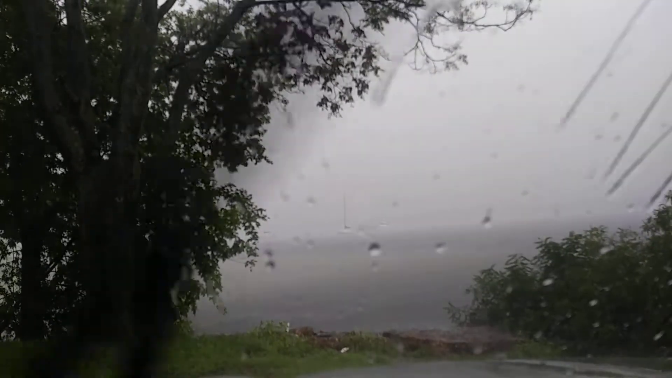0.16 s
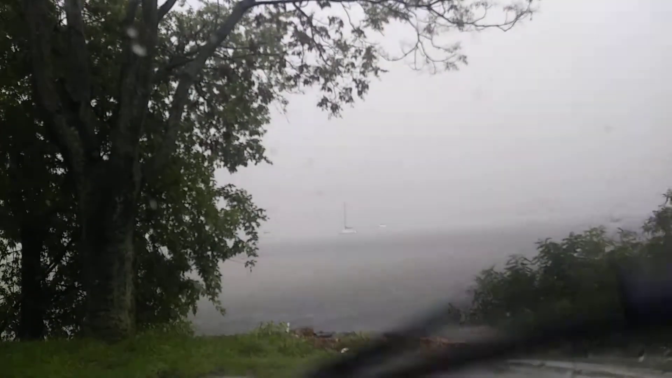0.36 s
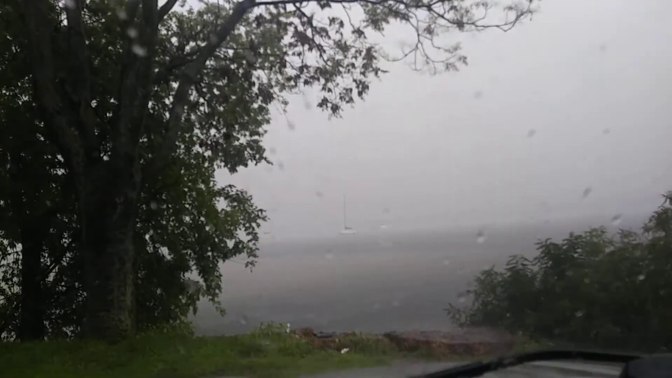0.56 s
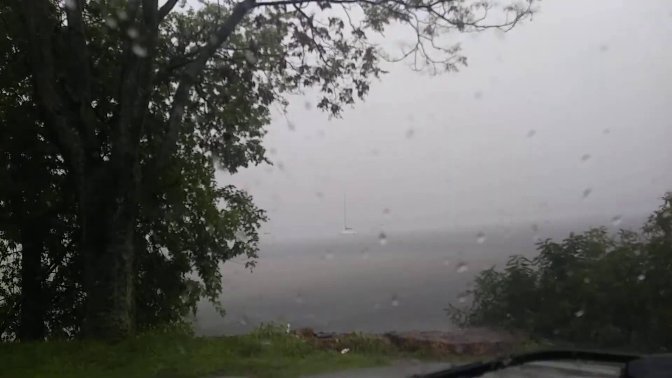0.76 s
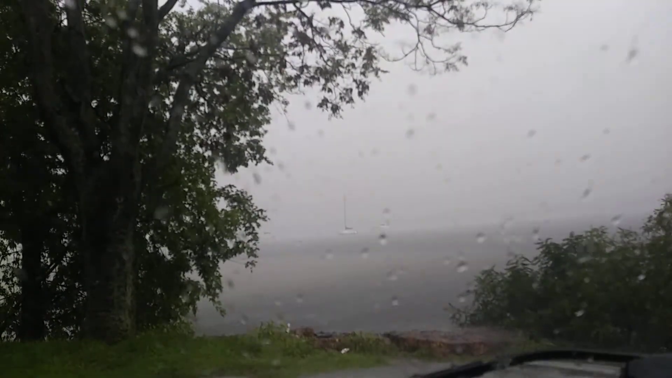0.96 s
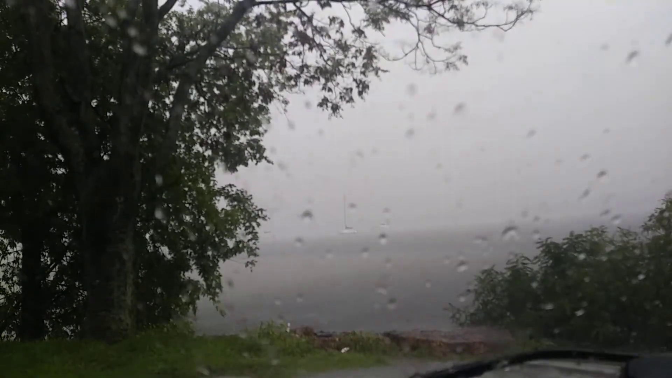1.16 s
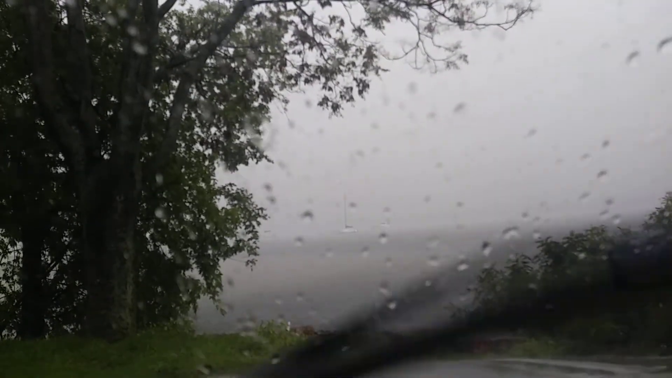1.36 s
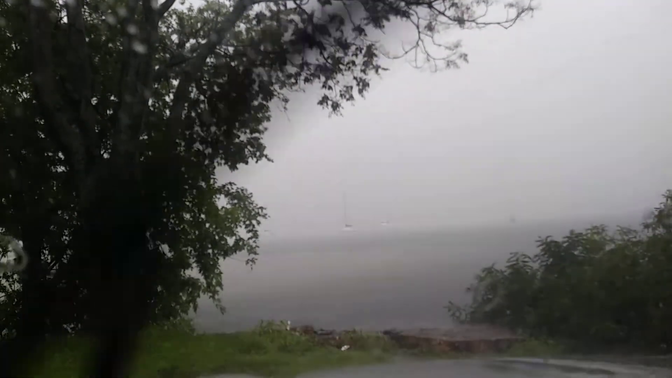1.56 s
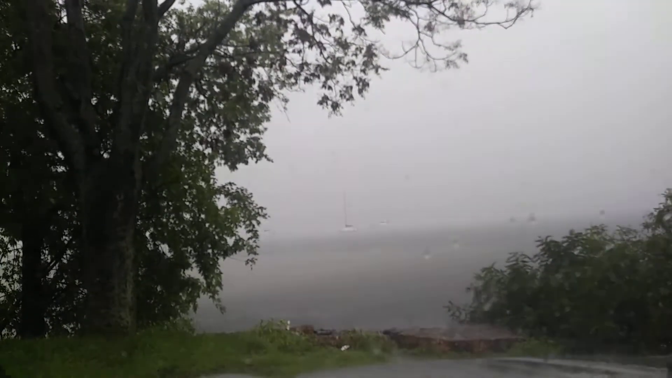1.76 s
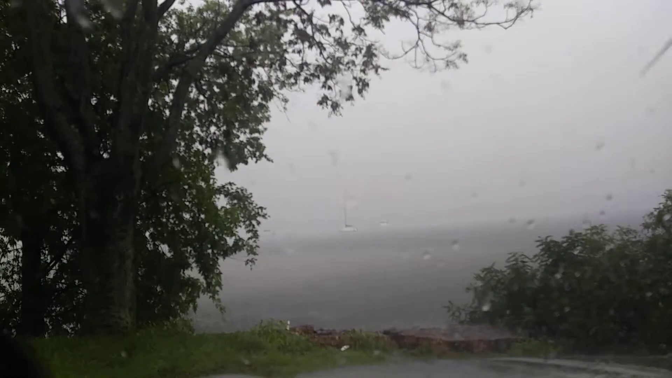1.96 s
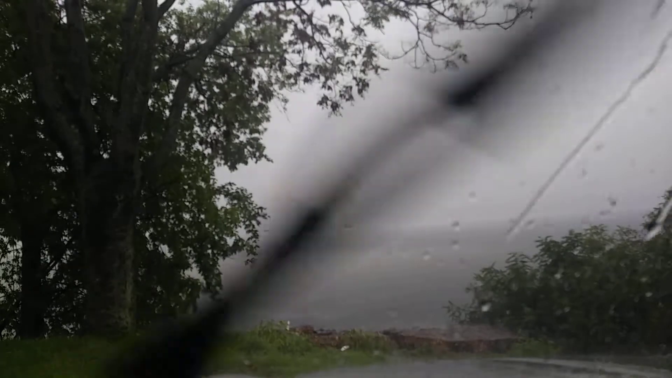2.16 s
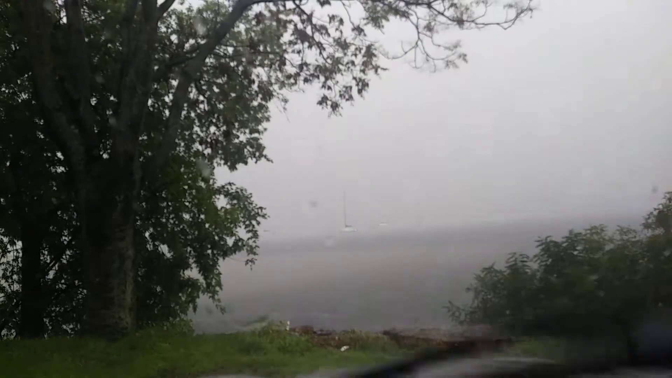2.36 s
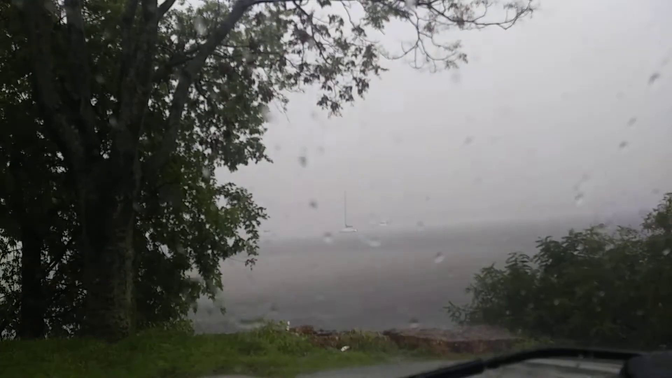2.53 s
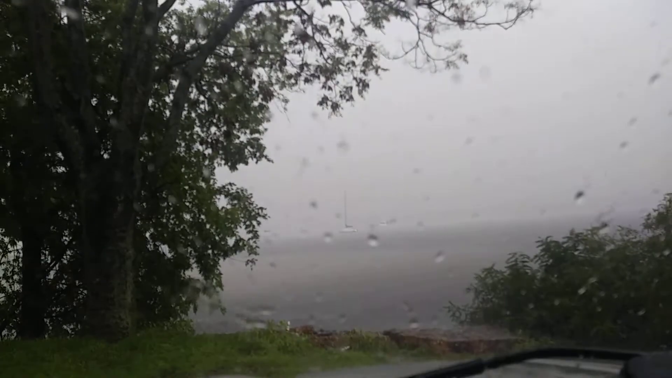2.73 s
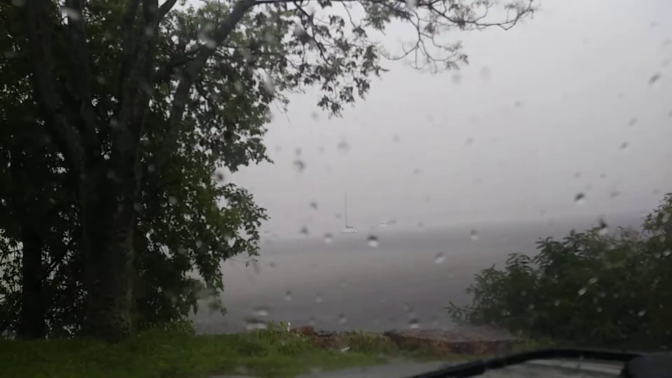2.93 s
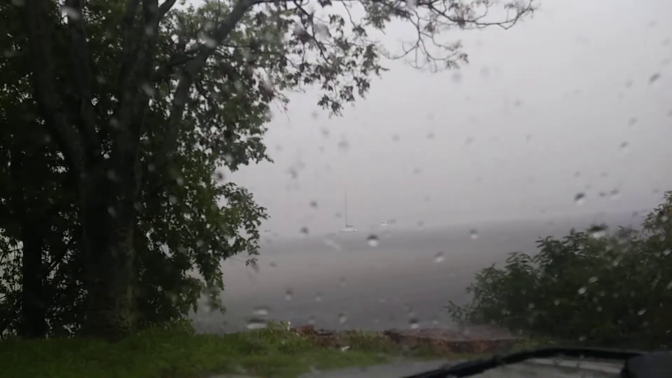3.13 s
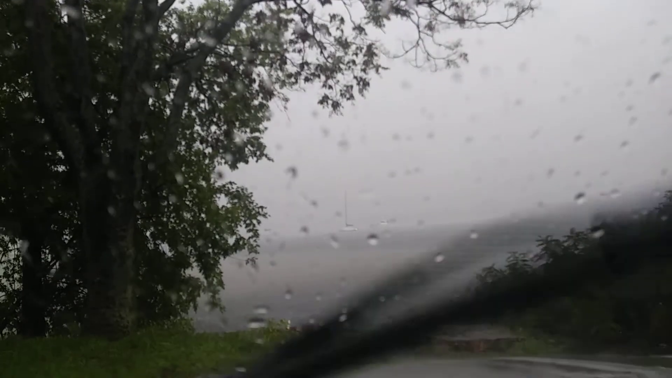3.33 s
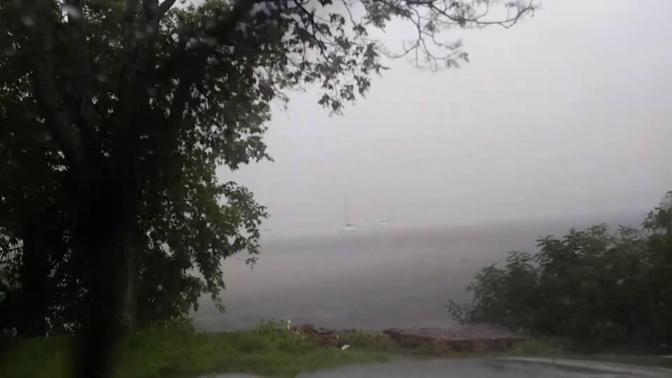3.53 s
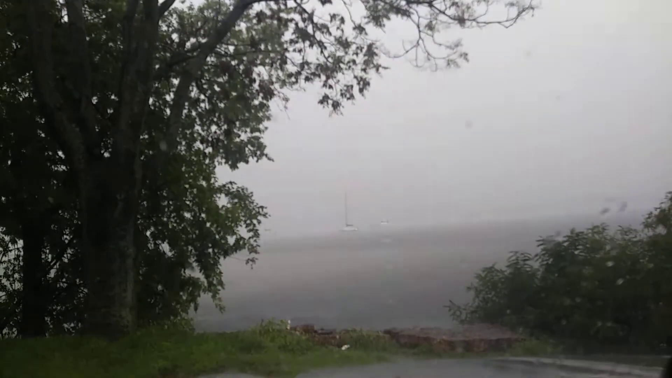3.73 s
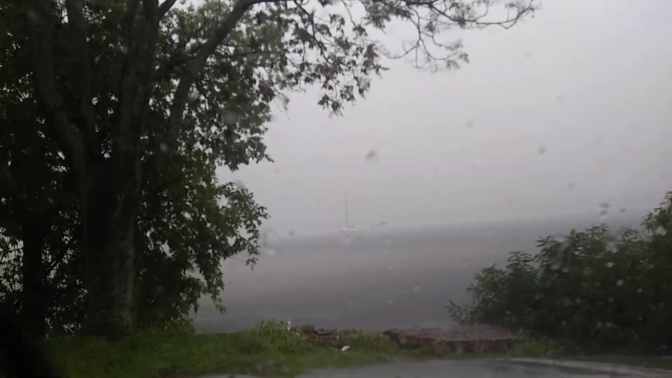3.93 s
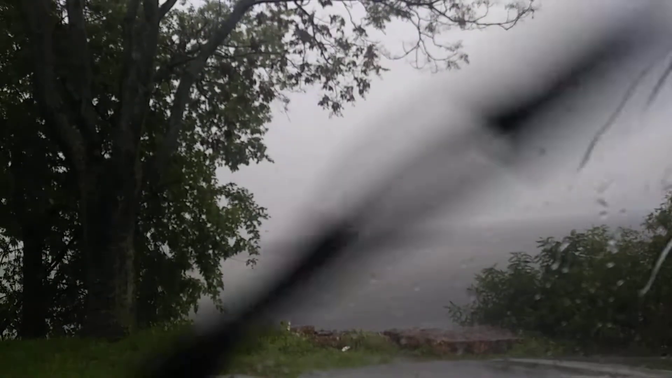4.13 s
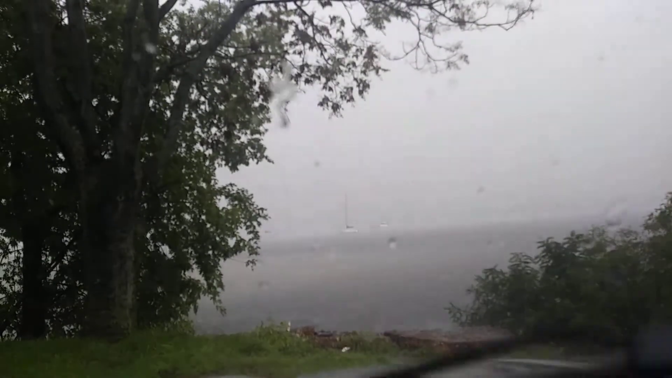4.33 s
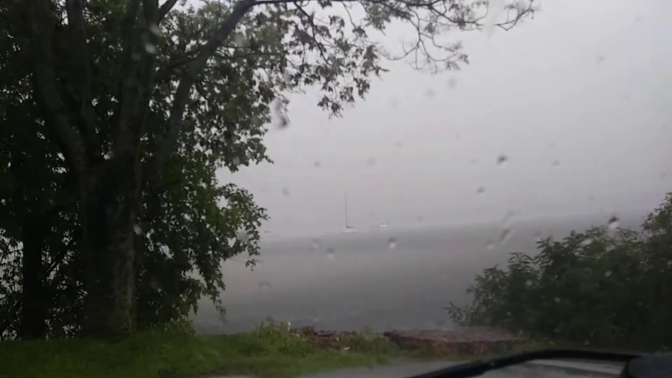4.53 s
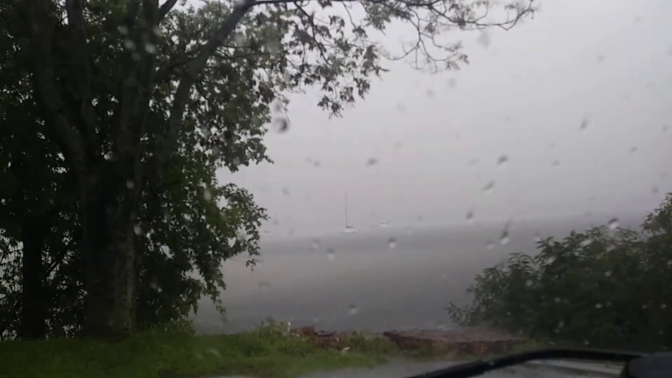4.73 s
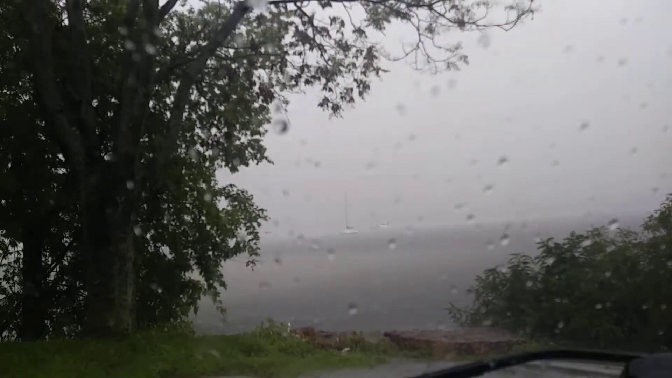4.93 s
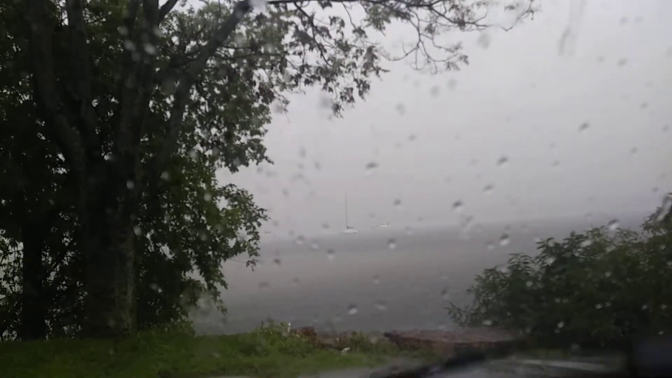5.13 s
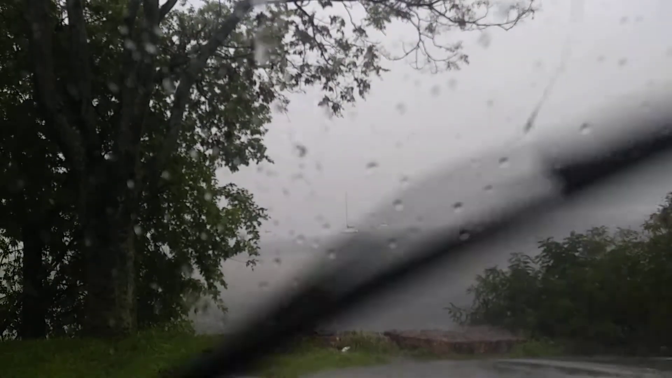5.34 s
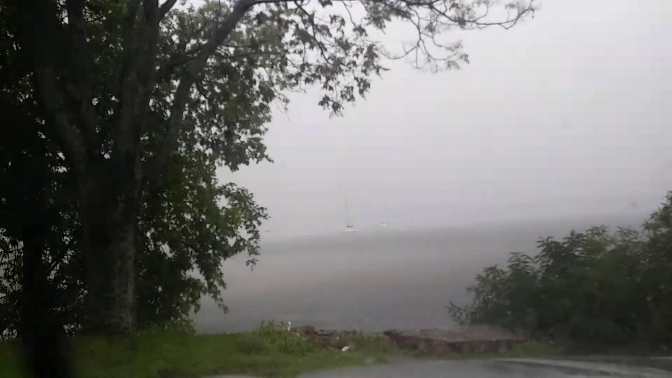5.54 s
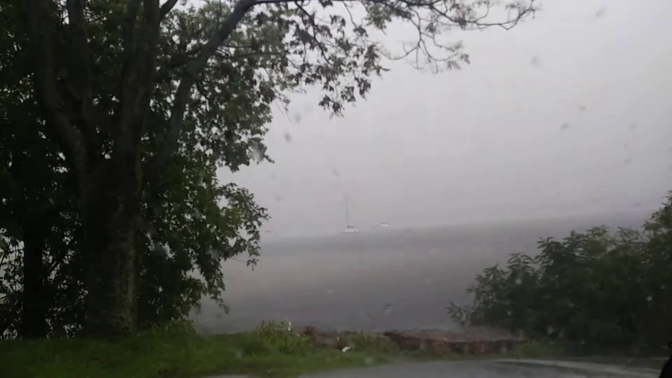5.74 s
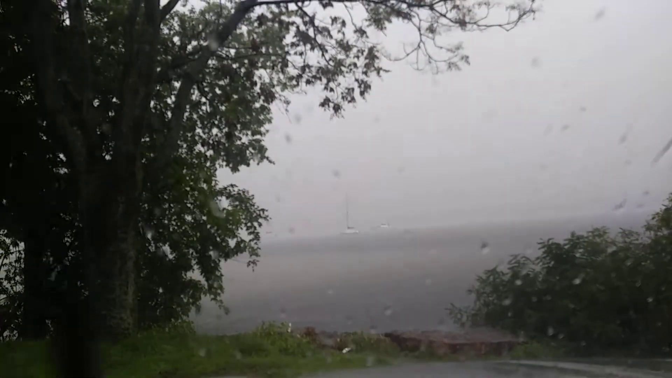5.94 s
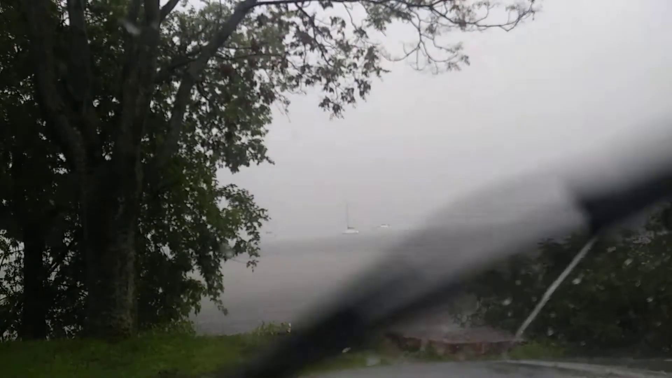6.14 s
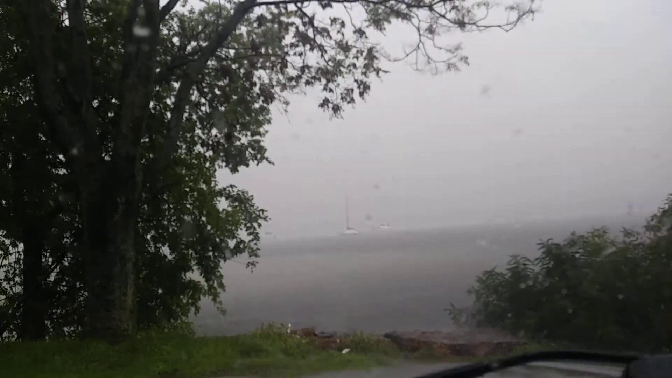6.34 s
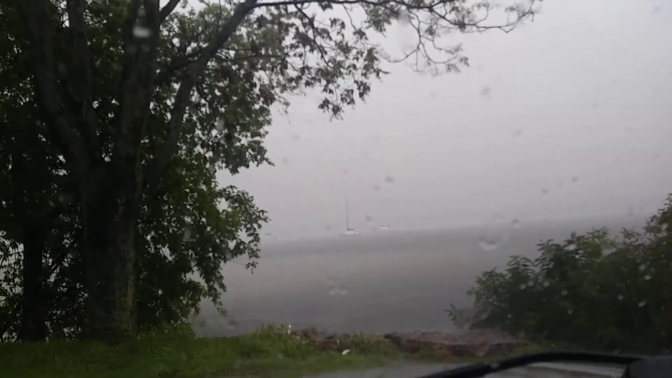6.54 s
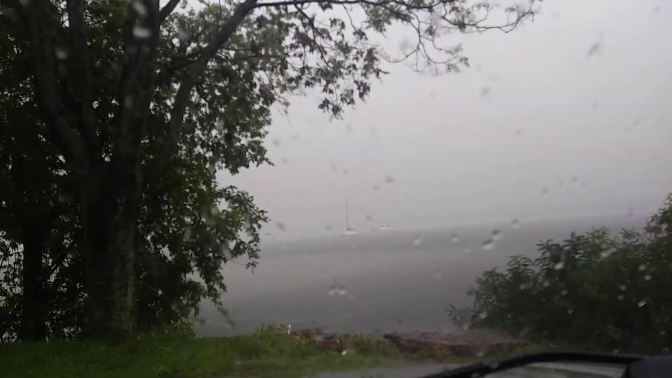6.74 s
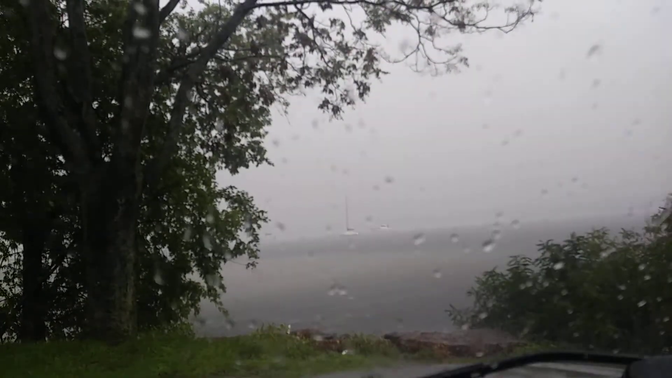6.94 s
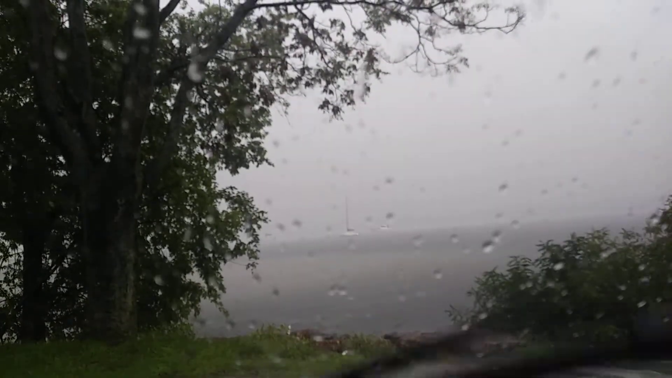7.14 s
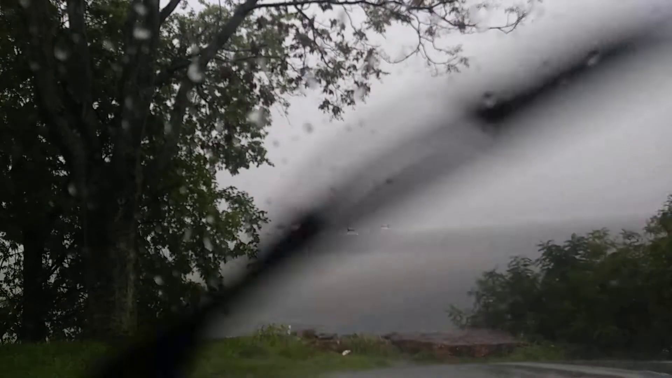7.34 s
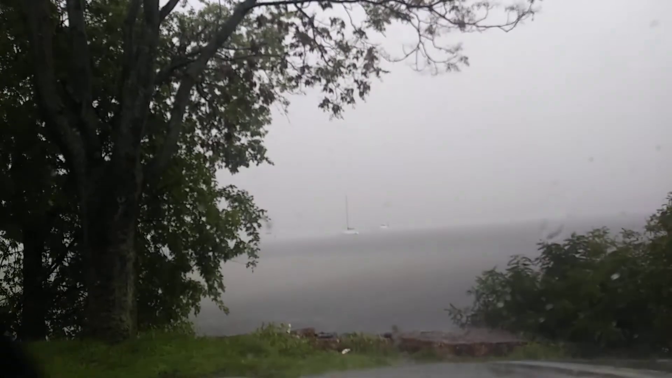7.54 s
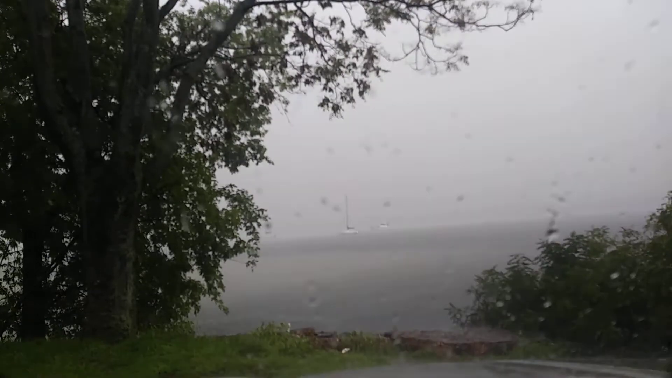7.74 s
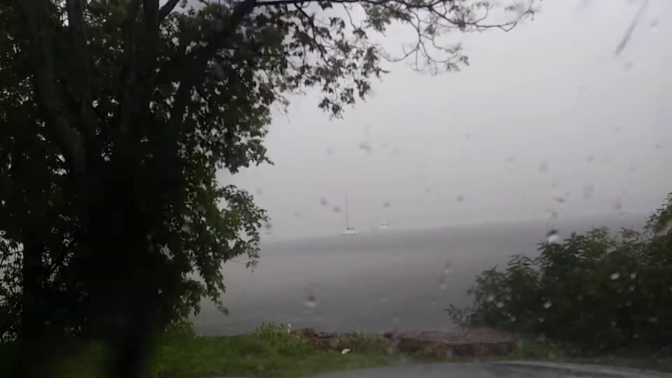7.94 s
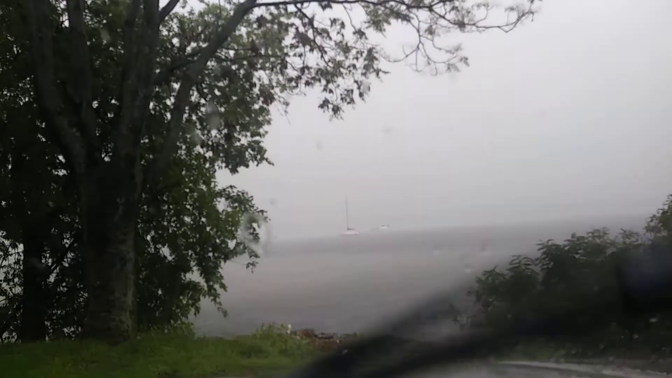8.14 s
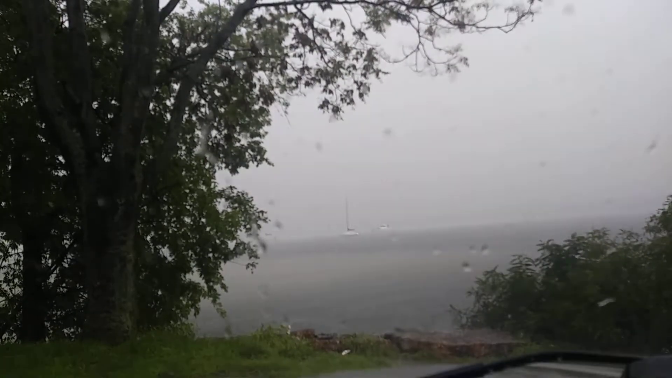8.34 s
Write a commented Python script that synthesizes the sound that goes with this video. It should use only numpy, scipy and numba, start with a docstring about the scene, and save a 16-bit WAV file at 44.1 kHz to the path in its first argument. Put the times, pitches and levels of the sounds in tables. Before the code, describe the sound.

Windshield wipers thump dully back and forth inside a parked car, with brief metallic jingles, over a soft steady hiss of heavy rain.

```python
"""Wipers and heavy rain inside a parked car

At each turn and rest of the wipers the linkage knocks the body: damped modes boom, with ever weaker rebounds.
At the top turn loose metal jingles: runs of taps ring short high modes. Motor and arms shake the body with
a low shudder that surges at times. Rain hisses on roof and glass as banded noise with random drops; single
drops ping and tick as short tones and clicks. Decaying noise gives metal, pings and ticks a brief reverberation."""
import sys
import numpy as np
from scipy import signal
from scipy.fft import rfft, irfft
from scipy.io import wavfile
from scipy.ndimage import uniform_filter1d
from numba import njit

SR = 44100
rng = np.random.default_rng(int(sys.argv[2]) if len(sys.argv) > 2 else 0)


def materialize(psi):
    """Save the field psi as 16-bit PCM at rate SR to the path in sys.argv[1].

    A 1-D psi becomes a single channel; in a 2-D psi each row is a channel.
    """
    bounded = np.clip(np.atleast_2d(psi).T, -1, 1)
    quanta = np.round(bounded * 32767).astype(np.int16)
    wavfile.write(sys.argv[1], SR, quanta)


N = 369999  # length in samples


def undb(db):
    """Decibel law: 20 dB is a factor of ten in amplitude."""
    return 10 ** (np.asarray(db) / 20)


def level(x, db):
    """Root-mean-square level: scales a signal to the given RMS."""
    return x * undb(db) / np.sqrt(np.mean(x ** 2))


def walk(rate):
    """Slow random modulation: levels held 1 / rate s, slewed twice, with a standard deviation of 1."""
    hold = int(SR / rate)
    steps = np.repeat(rng.standard_normal(N // hold + 1), hold)
    slewed = uniform_filter1d(uniform_filter1d(steps, hold), hold)[:N]
    return slewed / slewed.std()


def ring(x, hz, t60):
    """Forced resonance: a steady drive excites one damped mode."""
    pole = np.exp((2j * np.pi * hz - np.log(1000) / t60) / SR)
    return signal.lfilter([1], [1, -pole], x).imag


@njit
def add(out, s, hz, gain, phase, t60, rise):
    """Free damped vibration: each blow swells with time constant rise and falls 60 dB in t60 s."""
    for k in range(len(s)):
        z, gap = gain[k] * np.exp(1j * phase[k]), 1.
        pole = np.exp((2j * np.pi * hz[k] - np.log(1000) / t60[k]) / SR)
        close = np.exp(-1 / (rise[k] * SR))
        start = int(s[k] * SR)
        for i in range(start, min(start + int(1.2 * t60[k] * SR), len(out))):
            z, gap = z * pole, gap * close
            out[i] += z.imag * (1 - gap) ** 2


def strike(out, s, hz, db, t60, rise, phase=0.):
    """Superposition: sums the rings of a row of blows; single values hold for all of them."""
    add(out, s, hz + 0 * s, undb(db) + 0 * s, phase + 0 * s, np.maximum(t60, .01) + 0 * s, rise + 0 * s)


HISS_DB = -78


def hiss():
    """Self-noise of the microphone: white noise through a one-pole filter, a little weaker in the treble."""
    return level(signal.lfilter([1], [1, -.25], rng.standard_normal(N)), HISS_DB)


# spectrum of the rain on roof and glass: pitch_hz, relative_density_db (dB per Hz)
RAIN_SPECTRUM = [(120, -47), (200, -8.5), (254, 2.5), (328, -17.5), (361, -1), (403, -9), (554, -0.5),
                 (704, -4), (1830, -7), (2080, -10), (4470, -8), (4840, -7), (6540, -22), (9000, -36),
                 (11700, -64), (19800, -120)]
RAIN_DB = -61


def rain():
    """Shot noise: third-octave bands of far-drop haze plus sparse near drops, swelling together, flickering alone."""
    hz_axis = np.maximum(np.arange(N // 2 + 1) * SR / N, 1)
    table = np.array(RAIN_SPECTRUM)
    colour = undb(np.interp(np.log(hz_axis), np.log(table[:, 0]), table[:, 1]))
    # near drops, about 60 a second, splash over all bands at once
    splash_hits = rng.random(N) < 60 / SR
    splash_size = undb(4.5 * np.minimum(rng.exponential(size=N), 3.5))
    splash = splash_hits * splash_size * rng.choice([-1, 1], size=N)
    swell = walk(0.95)
    spectrum = rfft(level(splash, -13.0))
    for step in range(-8, 13):
        hz = 1000 * 2 ** (step / 3)
        drop_size = undb(2.2 * rng.exponential(size=N))
        drops = (rng.random(N) < .04 * hz / SR) * drop_size
        haze = undb(0.86 * swell + 1.03 * walk(6)) * rng.standard_normal(N)
        band = haze + level(drops - drops.mean(), -7)
        # neighbouring bands crossfade
        share = np.cos(np.clip(3 * np.log2(hz_axis / hz), -1, 1) * np.pi / 2)
        spectrum = spectrum + share * rfft(band)
    return level(irfft(spectrum * colour, N), RAIN_DB)


# lone short tones, from big drops or a single clink of the metal: start_s, pitch_hz, level_db
PING_TONES = [(.236, 12200, -56), (.236, 11300, -60), (.429, 6300, -38), (.430, 4420, -44.5),
              (.430, 7370, -55), (.454, 6330, -49), (.470, 8630, -56), (.740, 4700, -46),
              (1.211, 1370, -46.5), (1.772, 5040, -39), (1.773, 5800, -36), (1.772, 9500, -54),
              (1.772, 8000, -58), (1.889, 6800, -52), (1.918, 6800, -50), (2.417, 9200, -60),
              (2.514, 2900, -38.5), (2.514, 6400, -45), (2.630, 7270, -58), (3.150, 656, -41.5),
              (3.312, 5260, -47.5), (3.721, 5080, -39), (3.721, 6400, -47), (3.892, 10600, -61),
              (4.242, 1800, -50.5), (4.366, 9410, -56), (4.366, 600, -41.5), (4.683, 2860, -48),
              (4.82, 1860, -51), (4.855, 4890, -40.5), (4.855, 8500, -61), (5.10, 2670, -47),
              (5.145, 564, -41), (5.662, 4940, -35), (5.663, 6440, -48), (5.664, 1110, -48),
              (5.998, 1460, -49), (6.312, 1306, -46.5), (6.68, 550, -45.5), (6.781, 1750, -48.5),
              (7.044, 2966, -31), (7.044, 1354, -48), (7.077, 3010, -43), (7.095, 2970, -42.5),
              (7.561, 1156, -46.5), (7.601, 6450, -58), (7.614, 10100, -54), (7.635, 2110, -47),
              (8.255, 8540, -53)]
# dry ticks of drops on the glass: start_s, peak_db
GLASS_TICKS = [(0.2364, -59), (0.3544, -74), (0.4289, -67), (0.7404, -74), (2.4164, -68), (2.6289, -68),
               (4.366, -64), (4.8544, -74), (8.2574, -72)]
PING_T60_S = 0.046


def pings():
    """Impulse response: each ping is one short damped tone, each tick a bare one-sample impulse."""
    out = np.zeros(N)
    strike(out, *np.transpose(PING_TONES), PING_T60_S, 0.0018)
    s, db = np.transpose(GLASS_TICKS)
    out[(s * SR).astype(int)] += undb(db)
    return out


# jingles of the loose metal: start_s, length_s, level_db, then relative to that level:
# low_modes_db, high_modes_db, top_modes_db
JINGLE_RUNS = [(1.7797, 0.026, -30, -21.5, -26, -17), (3.729, 0.025, -27.5, -20.5, -30, -19),
               (5.6701, .034, -28.5, -12.5, -27, -15), (7.6205, 0.027, -29, -13.5, -19, -15.5)]
TAP_SCATTER_DB = 3
BUILD_DB, BUILD_S = -6.5, 0.0067  # a jingle starts this much weaker and builds with this time constant
DYING_DB_S, RATTLE_DB, RATTLE_GAP_S = 898, -20.5, 0.014  # fall rate, floor and spacing of the slow taps


def jingle_taps(count=5):
    """Repeated impact: a quick loud run of taps, then as many slow ones that sink to a weak rattle."""
    start, length, db, *colour_db = np.repeat(np.transpose(JINGLE_RUNS), count, axis=1)
    k = np.arange(len(start)) % count
    run = k * length / (count - 1)
    after = (k + 0.62) * RATTLE_GAP_S
    scatter_db = TAP_SCATTER_DB * rng.standard_normal((len(k), 2))
    loud_db = db + BUILD_DB * np.exp(-run / BUILD_S) + scatter_db[:, 0]
    weak_db = db + np.maximum(-DYING_DB_S * after, RATTLE_DB) + scatter_db[:, 1]
    loud = [start + run, loud_db, *colour_db]
    weak = [start + length + after, weak_db, *colour_db]
    return np.hstack([loud, weak])


# single taps as the arm turns: start_s, level_db, then relative to that level:
# low_modes_db, high_modes_db, top_modes_db
SINGLE_TAPS = [(1.871, -46.5, -23, -0.5, -5), (1.8884, -55, -16, -5, -23), (1.917, -52, -20, 6, -19),
               (3.8209, -40, -28, -9, -2), (3.8926, -62, -12, -8, -2), (5.7645, -44, -26, -2, -1),
               (5.771, -56, -17, -1, 0), (7.6044, -48.5, -11, -22, -25), (7.7174, -45, -22, -6, 0.5),
               (7.7214, -59, -13, 4, 1)]
# modes of the loose metal: pitch_hz, relative_level_db, t60_s
METAL_MODES = [(2803, 7, 0.012), (2960, -8, 0.022), (3110, 3, 0.052), (3330, 0.5, 0.028),
               (3600, 9.5, 0.031), (4008, -3, 0.055), (4790, -14, 0.032), (5050, -6.5, 0.036),
               (5130, -6.5, 0.039), (5480, -7.5, 0.042), (5420, -12, 0.026), (5570, -3.5, 0.012),
               (5744, -5, 0.029), (6000, -17, 0.03), (6020, -11, 0.054), (6414, -13.5, 0.047),
               (6770, -20.5, 0.032), (7150, -5.5, 0.045), (7720, -3.5, 0.057), (8600, -14, 0.04),
               (8400, -1, 0.038), (9150, -2, 0.035), (9260, 1.5, 0.02), (9470, -13, 0.023),
               (9810, -9, 0.043), (10080, -30, 0.046), (11160, -35, 0.058), (12100, -41, .05),
               (12400, -44, 0.034), (12750, -46, .05)]
# limits between the five groups of metal modes: pitch_hz
METAL_GROUP_LIMITS = [4400, 7000, 8700, 10300]


def loose_metal(count=4):
    """Modal excitation: each tap bounces within milliseconds, ringing other modes harder, a little off pitch."""
    taps = np.hstack([jingle_taps(), np.transpose(SINGLE_TAPS)])
    s, tap_db, low_db, high_db, top_db = np.repeat(taps, count, axis=1)
    bounce = np.arange(len(s)) % count
    s = s + .0045 * bounce * rng.random(len(s))
    # the second and the highest group take the plain tap level
    groups_db = np.array([low_db, 0 * s, high_db, top_db, 0 * s])
    drive_db = tap_db - 4.5 - 2.1 * bounce + groups_db
    luck = rng.standard_normal((len(s), len(METAL_MODES), 3))
    out = np.zeros(N)
    for k, (hz, db, t60) in enumerate(METAL_MODES):
        group = np.searchsorted(METAL_GROUP_LIMITS, hz)
        gain_db = drive_db[group] + db + 4.85 * luck[:, k, 0]
        mode_hz = hz * (1 + 0.0097 * luck[:, k, 1])
        strike(out, s, mode_hz, gain_db, t60, 0.0016, np.pi * luck[:, k, 2])
    return out


# surges in the shudder from motor and arms: peak_s, deep_db, boom_db
SHUDDER_SURGES = [(0.0, -51, -63), (1.35, -55, -67), (1.87, -54, -54.5), (2.01, -48, -69),
                  (3.29, -70, -65.5), (3.91, -62, -64), (3.99, -46, -81), (5.26, -48, -80),
                  (5.84, -49.5, -66), (6.36, -51.5, -68), (7.41, -68, -80), (7.69, -50, -60),
                  (7.78, -46, -54.5), (8.01, -56, -80)]
FLOOR_DEEP_DB, FLOOR_BOOM_DB = -63.5, -65.5  # weak constant level under the surges
SURGE_RISE_DB_S, SURGE_FALL_DB_S = 114, 118


def shudder():
    """Exponential envelopes: deep and boom gains are a weak floor plus surges with set rise and fall rates."""
    t = np.arange(0, N / SR + .01, .005)
    s, deep_db, boom_db = np.transpose(SHUDDER_SURGES)[:, :, None]
    shape_db = np.where(t < s, SURGE_RISE_DB_S * (t - s), SURGE_FALL_DB_S * (s - t))
    gains = []
    for floor_db, surge_db in ((FLOOR_DEEP_DB, deep_db), (FLOOR_BOOM_DB, boom_db)):
        gain = undb(floor_db) + undb(surge_db + shape_db).sum(axis=0)
        gains.append(np.interp(np.arange(N) / SR, t, gain))
    return gains


# linkage knocks: start_s, level_db, boom_pitch_hz, boom_t60_s, rebound_gap_s, loss_per_rebound_db,
# then relative to the level: deep_modes_db, panel_modes_db, trim_modes_db
LINKAGE_KNOCKS = [(0.0, -32, 182, .09, .05, 11, -5, -10.5, -13),
                  (0.436, -41, 171, .15, .04, 30, -11, -34, -33),
                  (.475, -32.5, 147, .15, .053, 8.5, -11, -12.5, -36),
                  (1.195, -41, 195, 0.16, .04, 30, 0.5, 2, -1),
                  (1.234, -26.5, 166, 0.11, 0.041, 11.5, -10, -9.5, -20),
                  (1.68, -30.5, 171, 0.18, 0.028, 28, -11, -22, -41),
                  (1.75, -37, 162.5, 0.093, .04, 30, -3, -19, -33),
                  (1.807, -31, 131, 0.12, 0.036, 28, -6, -28, -36),
                  (1.859, -18.5, 190, 0.1, .038, 8, -11.5, -9.5, -26),
                  (1.957, -30, 134, .12, .041, 13, -2.5, -27, -23),
                  (2.508, -54.5, 127, 0.18, 0.026, 4, 12, -19, -18),
                  (3.143, -41, 128, 0.16, .038, 0.5, -8, -1.5, 4.5),
                  (3.624, -46.5, 171, .16, 0.044, 32, -20, -16, -22),
                  (3.748, -37.5, 152, .13, .04, 30, 1, -30, -30),
                  (3.806, -21, 181.6, 0.17, .04, 30, -9, -12.5, -16.5),
                  (3.848, -18, 155.4, 0.096, .052, 23, -17, -21.5, -33),
                  (3.977, -37, 124, .13, .035, 7.5, 7, -32, -31),
                  (4.097, -44.5, 170, .13, 0.031, 26, -3, -19, -22),
                  (4.339, -40.5, 137.6, 0.17, .04, 30, -2, -22, -23),
                  (4.384, -32, 163.7, .12, 0.04, 16, -13, -18, -34),
                  (5.093, -36, 129, 0.2, 0.05, 1.5, 0, -3.5, -17),
                  (5.299, -51, 153, 0.28, .04, 35, 6, -23, -22),
                  (5.683, -33, 126.4, .16, .04, 30, -4.5, -24, -11.5),
                  (5.717, -28, 172, 0.14, 0.052, 30, -16, -32, -28),
                  (5.756, -23.5, 157.3, 0.1, 0.041, 16, -24, -4.5, -8.5),
                  (5.933, -43.5, 168.7, .2, .04, 30, -0.5, -30, -27),
                  (6.31, -40, 126, 0.21, .04, 30, -19, -22, -11),
                  (6.334, -30, 165.5, 0.1, .025, 9, -18, -25, -32),
                  (7.032, -31.5, 158, 0.17, 0.051, 32, 0, -19, -3),
                  (7.074, -19, 143.6, 0.13, 0.035, 5, -10, -17.5, -24),
                  (7.533, -29, 166, .13, .04, 32, -23, -47, -36),
                  (7.639, -44.5, 140, 0.11, .04, 28, -15, 0, -20),
                  (7.705, -16, 175, .12, .052, 9.5, -4, -11.5, -18),
                  (7.894, -41.5, 143, .1, 0.055, 6.5, -9, -34, -34),
                  (8.077, -49, 163, 0.17, .04, 27, -5, -25, -20),
                  (8.141, -35, 175, 0.11, 0.03, 34, -16, -25, -39),
                  (8.261, -24, 146, 0.11, .038, 12, -9, -22.5, -45)]
REST_HZ, SETTLE = 158, 0.43  # each rebound keeps this share of the step from the resting boom pitch
DEEP_LOSS, DULLING_DB = 0.58, 5.5  # deep modes lose only a share per rebound; panel and trim lose more


def rebounds(count=4):
    """Inelastic impact: knock and rebounds evenly spaced, ever weaker and duller, nearer the resting pitch."""
    columns = np.repeat(np.transpose(LINKAGE_KNOCKS), count, axis=1)
    s, db, hz, t60, gap, loss_db, deep_db, panel_db, trim_db = columns
    k = np.arange(len(s)) % count  # 0 is the knock itself
    boom_db = db - k * loss_db
    boom_hz = REST_HZ + (hz - REST_HZ) * SETTLE ** k
    groups_db = [db + deep_db - DEEP_LOSS * k * loss_db,
                 boom_db - 12.5,
                 boom_db + panel_db - DULLING_DB * k,
                 boom_db + trim_db - DULLING_DB * k]
    return s + k * gap, boom_db, boom_hz, t60, np.array(groups_db)


# modes of the car body: pitch_hz, relative_level_db, t60_s
BODY_MODES = [(52.2, 0, 0.26), (68.9, -7, 0.34), (89.4, -3, 0.38), (126.1, -9, 0.52), (152.6, 1.5, 0.24),
              (178.2, 1.5, 0.19), (241, 2.5, 0.14), (318.2, 0, 0.1095), (373, -4, 0.082), (422, -5, 0.13),
              (471, -7.5, 0.099), (571, -17.5, 0.088)]
# limits between deep, boom, panel and trim modes: pitch_hz
BODY_GROUP_LIMITS = [110, 230, 350]
SWELL_CYCLES = 2.14  # time constant of the boom's swell, in cycles


def body():
    """Modal resonance: each knock booms at its own listed pitch and rings the body; rubber joints soften the start."""
    s, boom_db, boom_hz, boom_t60, drive_db = rebounds()
    deep_gain, boom_gain = shudder()
    luck = rng.standard_normal((len(s), len(BODY_MODES), 2))
    out = np.zeros(N)
    strike(out, s, boom_hz, boom_db + 8.5, boom_t60, SWELL_CYCLES / boom_hz)
    for k, (hz, db, t60) in enumerate(BODY_MODES):
        group = np.searchsorted(BODY_GROUP_LIMITS, hz)
        mode_hz = hz * (1 + 0.032 * luck[:, k, 0])
        rise = 0.56 * SWELL_CYCLES / hz
        strike(out, s, mode_hz, drive_db[group] + db + 2.5, t60, rise, 0.72 * luck[:, k, 1])
        # the shudder drives panel and trim modes 12 dB less
        shake_db = db - (12 if group > 1 else 0)
        shake = level(ring(rng.standard_normal(N), hz, 0.52 * t60), shake_db)
        out += (boom_gain if group else deep_gain) * shake
    return out


CABIN_T60_S, CABIN_DB = 0.26, -12.5


def cabin(near):
    """Reverberation: convolution with exponentially decaying noise that starts 3 ms late."""
    t = np.arange(SR // 3) / SR
    tail = rng.standard_normal(len(t)) * np.exp(-np.log(1000) * t / CABIN_T60_S) * (t > .003)
    unit_tail = tail / np.sqrt(np.sum(tail ** 2))
    return undb(CABIN_DB) * signal.fftconvolve(near, unit_tail)[:N]


def scene():
    """Superposition: all sources add; only metal, pings and ticks excite the cabin."""
    near = loose_metal() + pings()
    return (near + cabin(near) + body() + rain() + hiss())[None]


TOP_HZ = 15720


def record(dry):
    """Band limiting: the microphone loses the deepest bass; the recorder cuts the top."""
    thin = signal.sosfilt(signal.butter(3, 38, "high", fs=SR, output="sos"), dry)
    return signal.sosfilt(signal.ellip(10, .2, 60, TOP_HZ, fs=SR, output="sos"), thin)


dry = scene()
out = record(dry)
materialize(out)
```